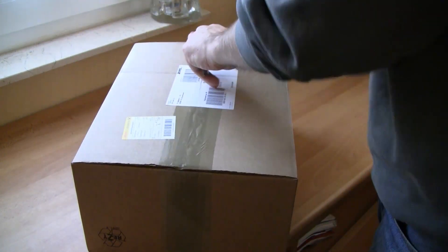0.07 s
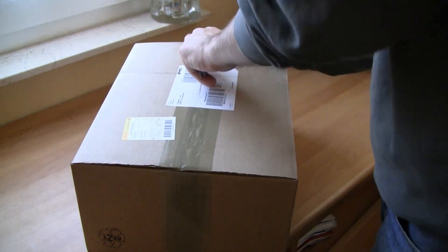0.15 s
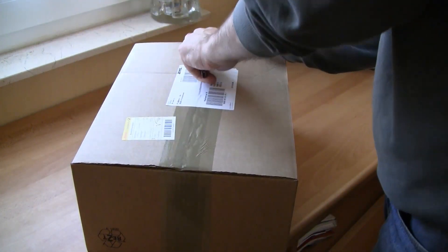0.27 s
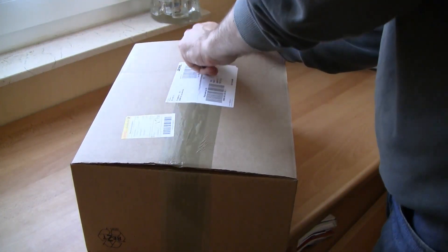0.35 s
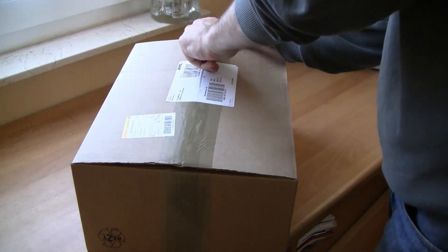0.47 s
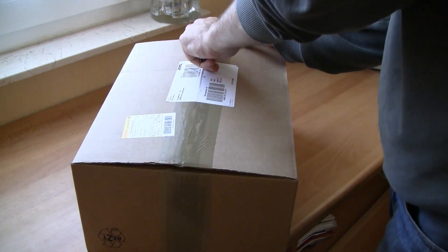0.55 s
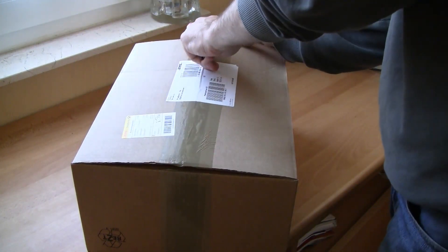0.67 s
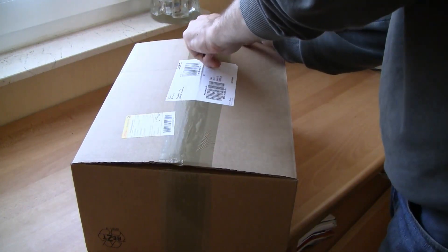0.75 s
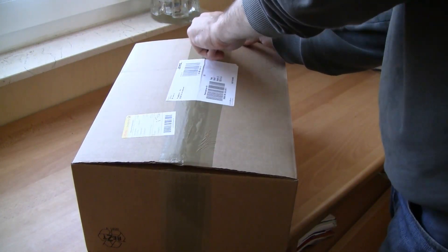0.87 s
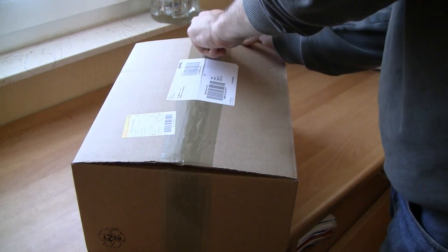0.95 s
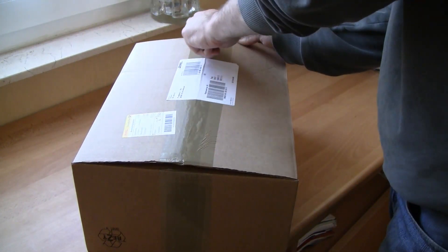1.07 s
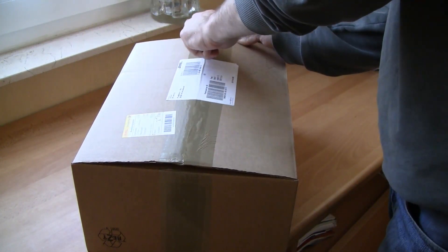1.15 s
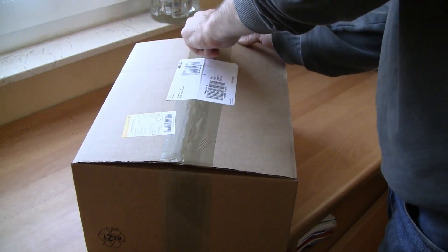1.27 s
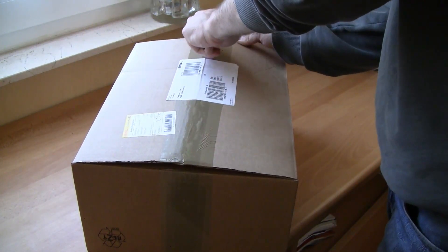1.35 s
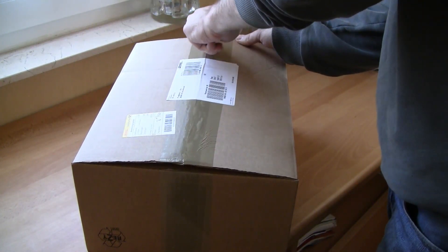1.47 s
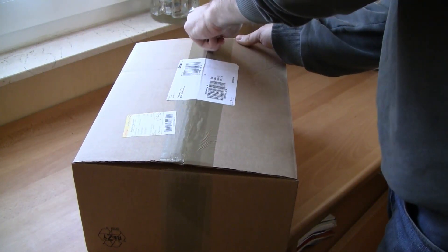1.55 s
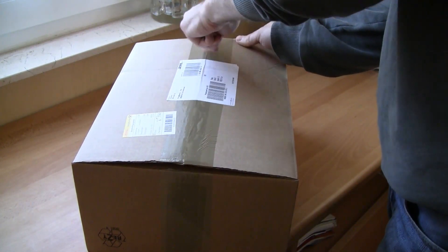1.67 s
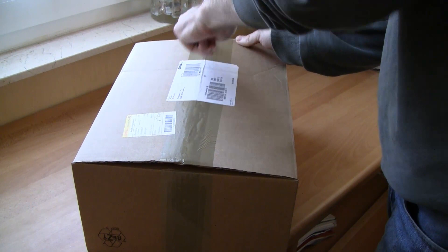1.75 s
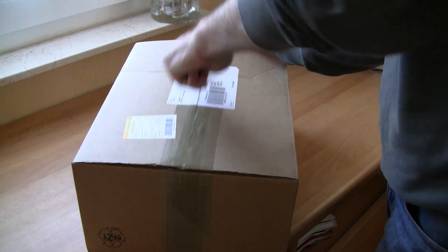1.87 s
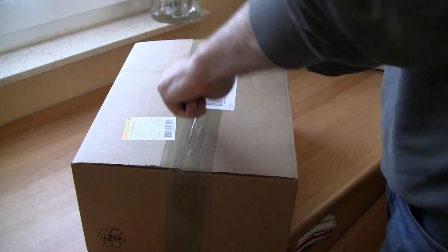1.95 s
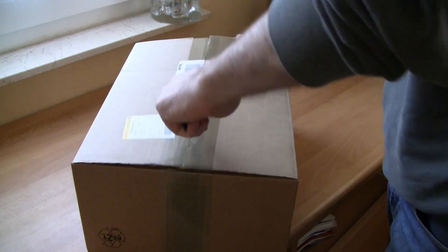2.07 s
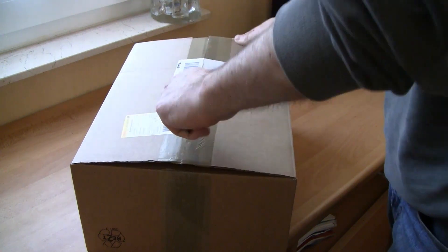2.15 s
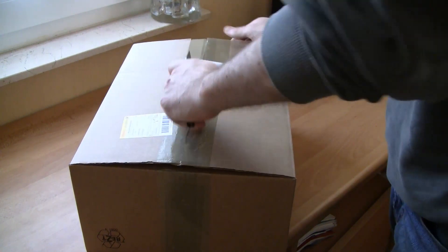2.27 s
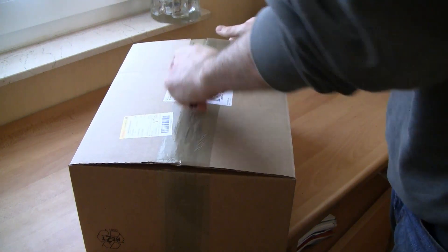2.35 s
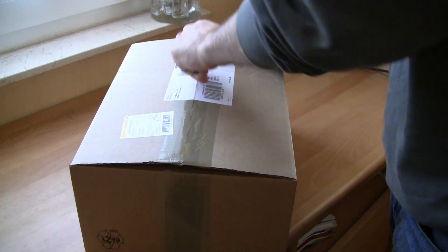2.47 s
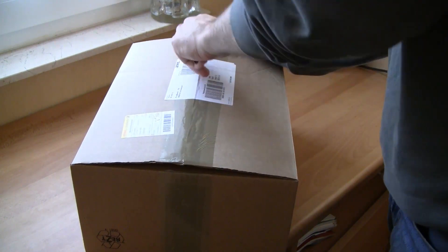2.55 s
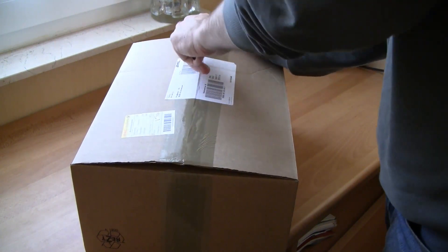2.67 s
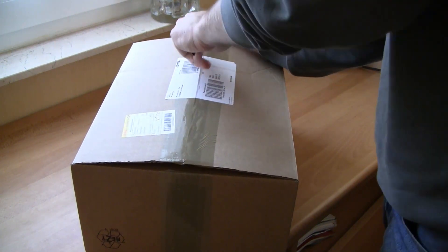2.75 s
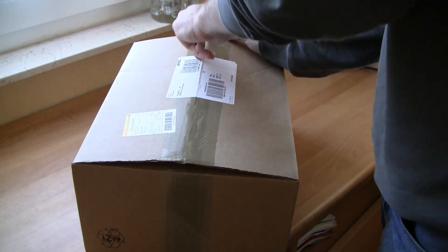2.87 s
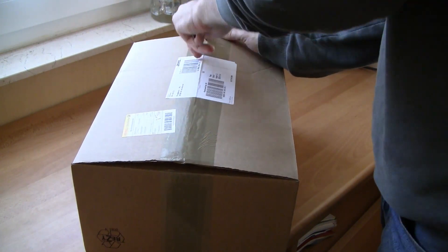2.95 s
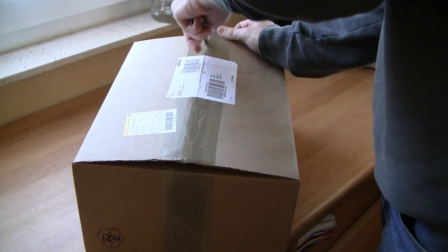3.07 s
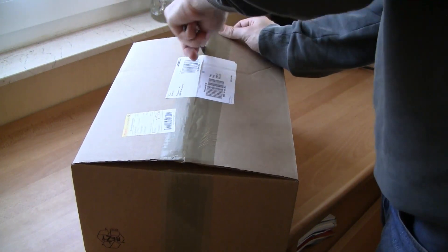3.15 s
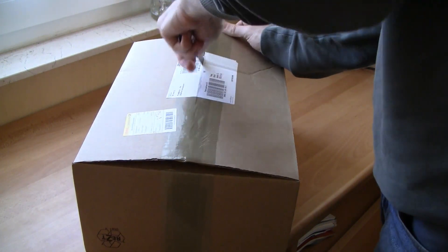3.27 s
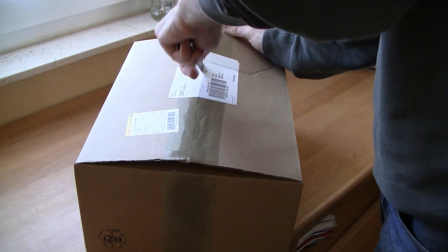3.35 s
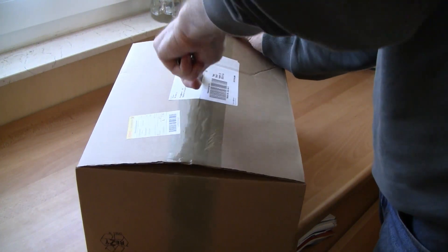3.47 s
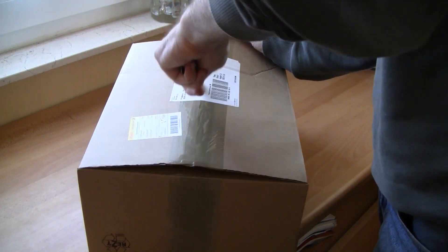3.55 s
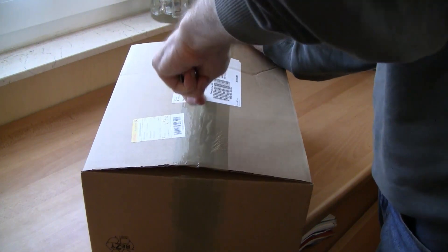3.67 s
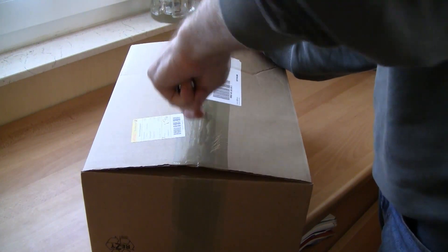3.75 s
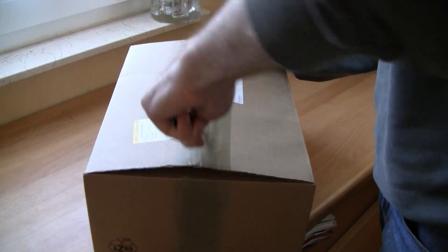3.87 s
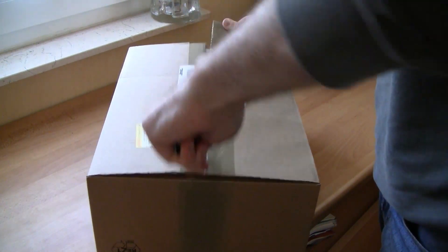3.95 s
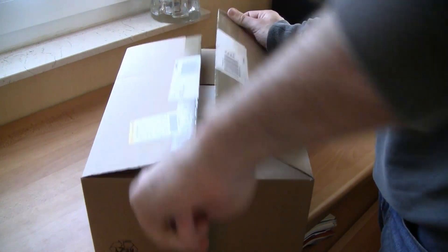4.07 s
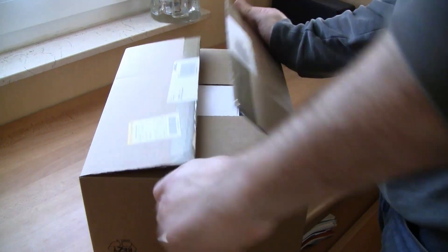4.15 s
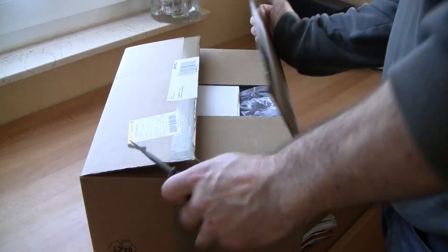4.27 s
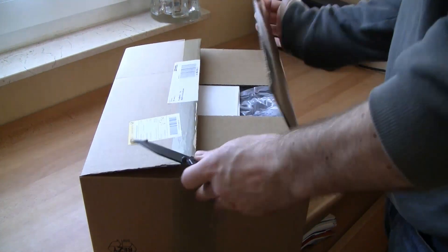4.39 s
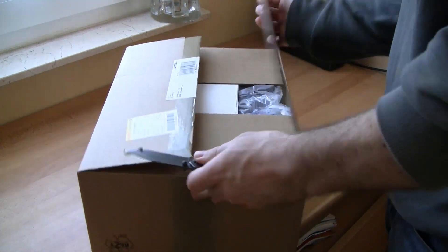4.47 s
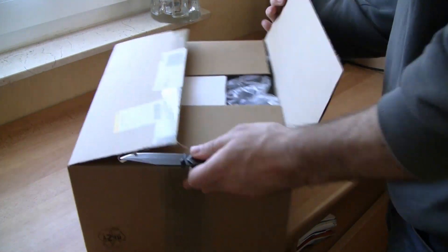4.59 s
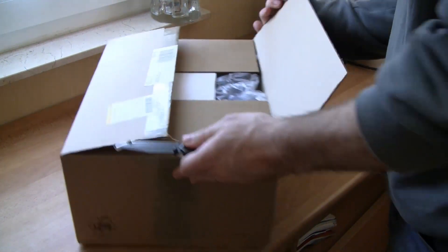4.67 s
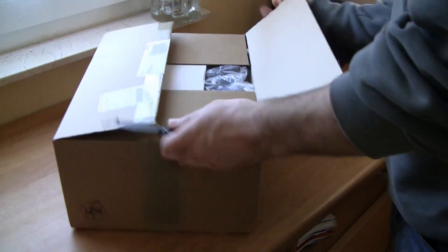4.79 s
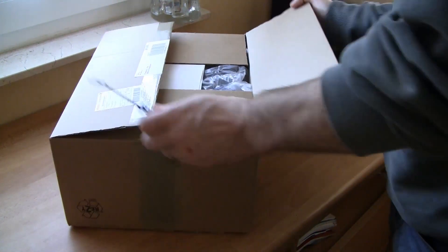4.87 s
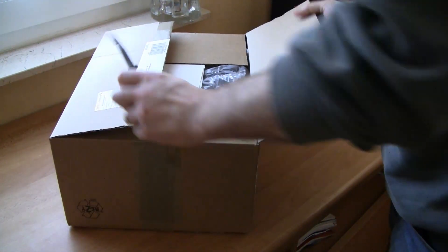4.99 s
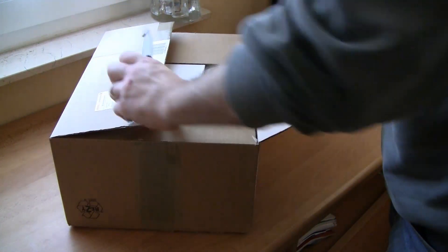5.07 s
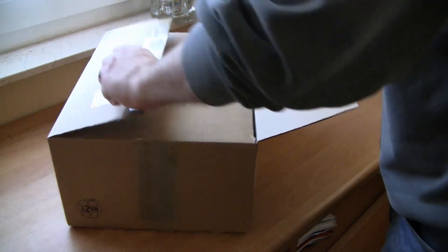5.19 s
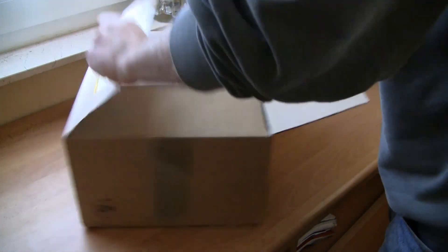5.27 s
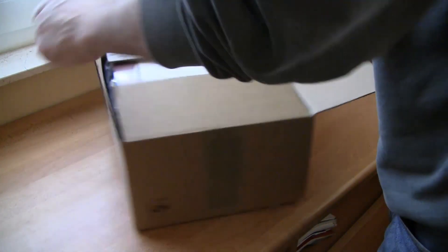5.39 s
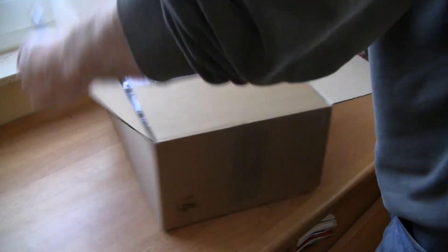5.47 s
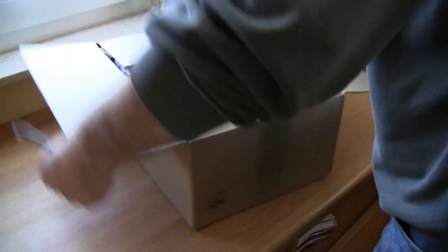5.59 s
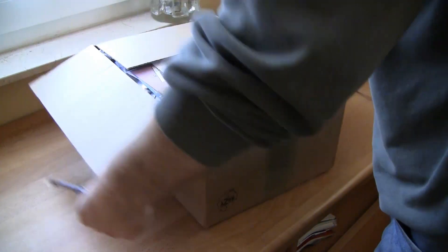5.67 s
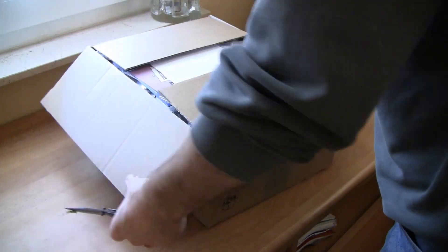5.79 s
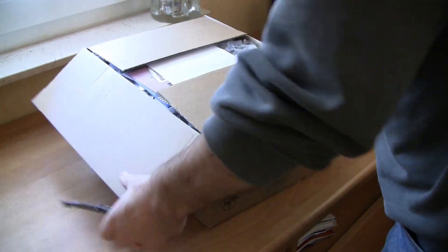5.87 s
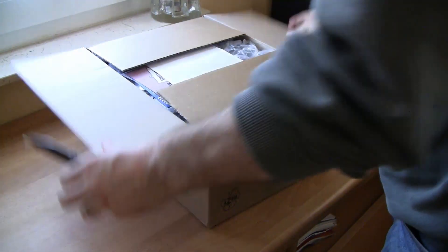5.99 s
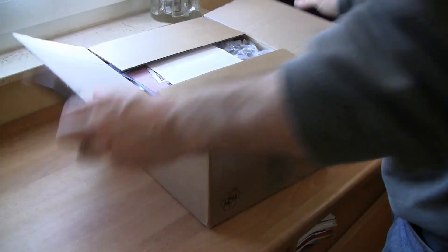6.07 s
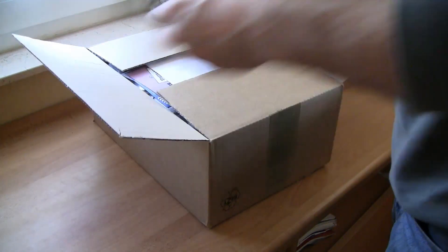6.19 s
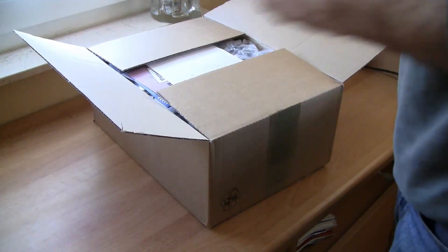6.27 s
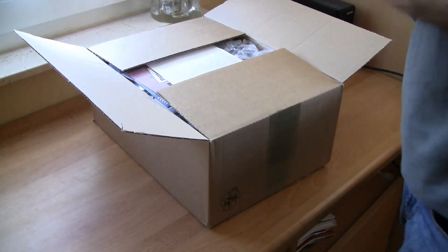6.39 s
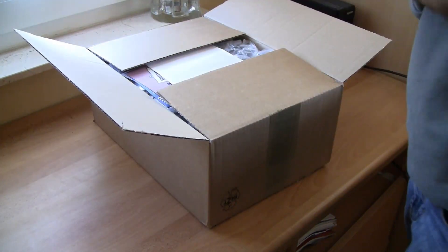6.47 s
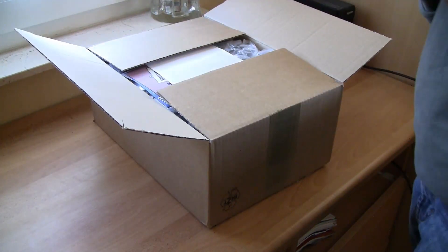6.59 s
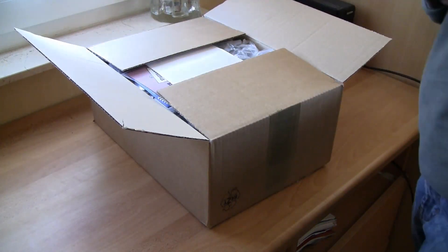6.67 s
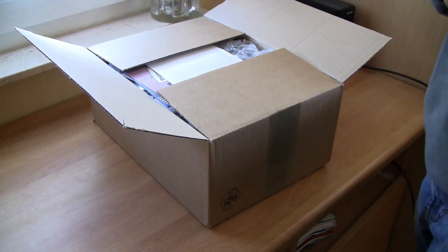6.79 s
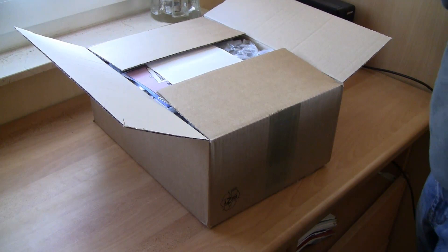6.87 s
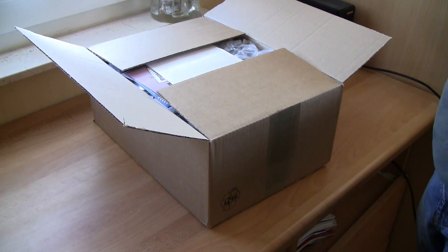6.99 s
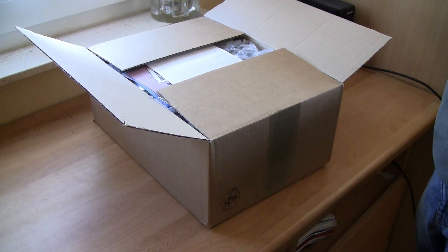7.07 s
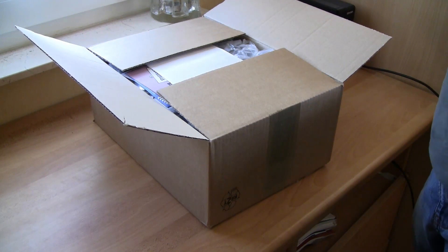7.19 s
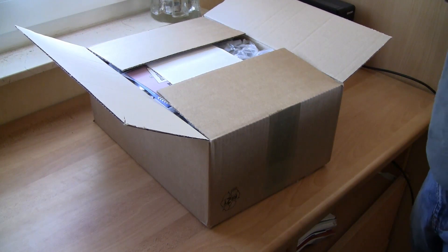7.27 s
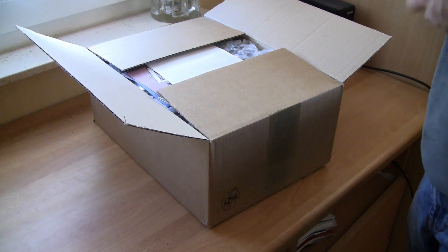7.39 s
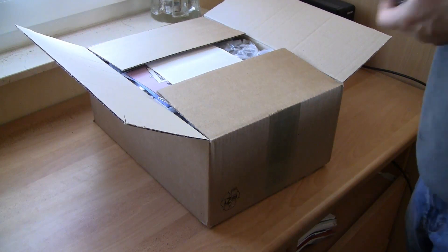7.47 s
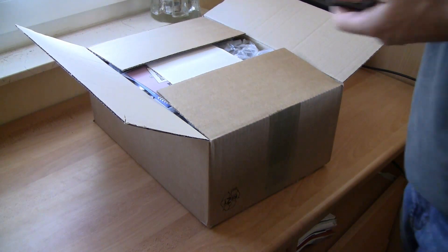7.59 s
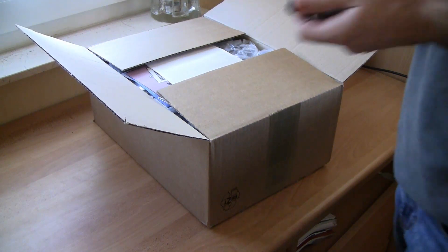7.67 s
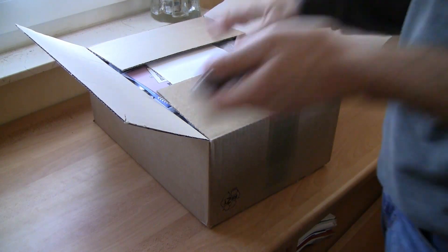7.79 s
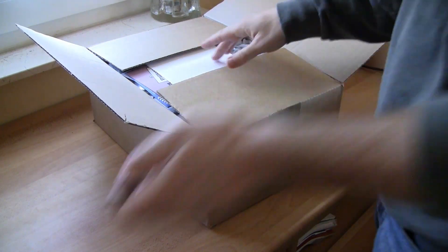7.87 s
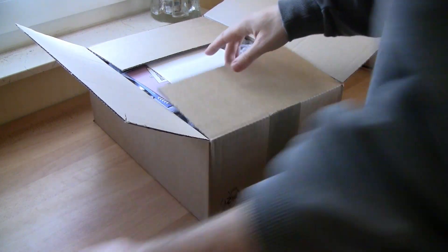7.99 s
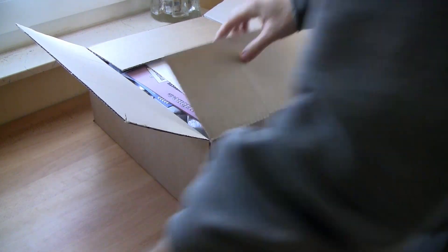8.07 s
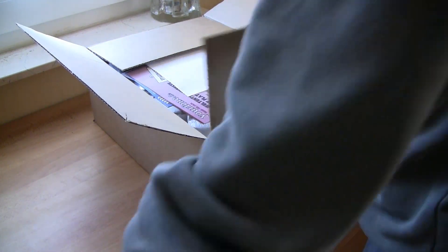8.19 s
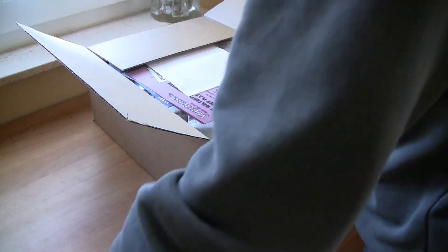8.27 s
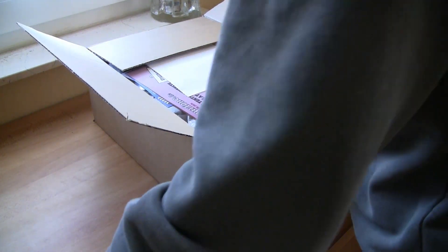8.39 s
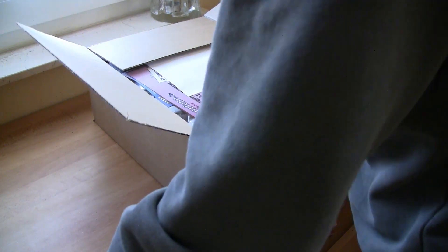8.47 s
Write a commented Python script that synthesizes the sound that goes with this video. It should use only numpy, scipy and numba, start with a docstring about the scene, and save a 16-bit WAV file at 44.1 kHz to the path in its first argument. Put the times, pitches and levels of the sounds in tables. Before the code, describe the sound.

Sparse dull knocks, dry scuffs and tape crackles on a carton come first in a small quiet room. Then a hard thump starts a tearing slit that ends in a burst of sharp cracks and a loud hollow pop. Flaps fold with papery rubbing, the box thuds and drags, and after a quiet pause a folding knife snaps shut, followed by soft handling. Heard close, in stereo.

```python
"""A hand is heard first, sliding over a hollow taped cardboard box, with light knocks and cracks; then a
knife slits the tape, flaps pop and drum the box, the box is dragged round and the knife snaps shut.
Stick-slip friction excites panel modes, enclosed air and tape noise; blows ring the panels, cracks are
noise bursts, squeezes ring the air and the knife sounds its steel modes. Beneath lie room tone and a
faint rumble; a small room reflects all but the tone to a stereo microphone."""
import sys
import numpy as np
from scipy import signal
from scipy.fft import rfft, irfft, next_fast_len
from scipy.io import wavfile
from numba import njit

SR = 44100
rng = np.random.default_rng(int(sys.argv[2]) if len(sys.argv) > 2 else 0)


def dump(signal):
    """Clip the signal to [-1, 1] and save it as 16-bit WAV at the path in sys.argv[1]."""
    limited = np.clip(np.atleast_2d(signal).T, -1, 1)
    pcm = np.round(limited * 32767).astype(np.int16)
    wavfile.write(sys.argv[1], SR, pcm)


N = 376598  # length in samples

# Background
# spectrum of the room tone: pitch_hz, density_db (per Hz)
HUSH = [(12, -24), (20, -28), (165, -13), (200, -11.5), (237, -13.5), (428, -11.5), (465, -11.5),
        (506, -10.5), (690, -14), (1280, -17.5), (3330, -26.5), (14300, -34), (16500, -45)]
HUSH_DB = -59.5  # rms of the mid signal
# room tone, side against mid: pitch_hz, level_db
HUSH_SIDE = [(60, -7), (110, -6), (200, 8), (380, 7), (700, 5), (1290, 2.5), (2380, 0), (4400, 0),
             (8120, 0), (15000, -4)]
RUMBLE_HZ, RUMBLE_DB = 60, -76

# Box panels and the air inside
# panel modes: pitch_hz, level_db, width_hz (nominal; each excitation scales it)
BOX = [(168, -10, 59), (226.6, -4.5, 11.8), (233.5, -4.5, 70), (290.5, 3.5, 104), (304, -9.5, 10),
       (343.3, -0.5, 56), (425.2, -3.5, 25), (493, -9.5, 8.3), (582.5, 8, 105), (671, 9.5, 139),
       (772.4, 10.5, 104.5), (973, 8.5, 170), (1085, 11, 185), (1360, 11.5, 321), (1582, 9.5, 374),
       (2070, 2.5, 543), (2430, -2, 510)]
UPPER_HZ = 550  # modes above this count as upper
PANEL_SPREAD = 0.059  # panel modes lean left or right by turns, giving the box some width
FLEX_DB = 0.49  # bent board shifts its modes; spread of their pitch ratio
AIR_HZ, AIR_WIDTH_HZ = 122.3, 11.8
DESK_HZ, DESK_DB = 55.6, -18.5  # the desk rumbles under the push

# blows on the box: start_s, level_db (peak before the bass cut), upper_db (against lower modes), panel_hz
KNOCKS = [(0.144, -36, -19, 303), (0.171, -29.5, -18, 183), (0.223, -18, -8.5, 284.3),
          (0.456, -38, -8, 486), (0.526, -38.5, -2, 490), (0.602, -30, -3, 870), (0.697, -34.5, 1, 1083),
          (1.024, -30, -3, 430), (1.043, -33, 1, 490), (1.093, -37.5, -14, 440), (1.1755, -17, -10.5, 343),
          (1.321, -31, -24, 443), (1.343, -40, 3, 370), (1.668, -41, -11, 331), (1.704, -20, -10, 232),
          (1.713, -29, 6, 308), (1.97, -28, -29, 303), (1.985, -26, -27, 343), (2.004, -27, -19, 440),
          (2.176, -24.5, -2, 480), (2.274, -35, -12, 497), (2.303, -30, 0, 1083), (2.32, -24.5, -19.5, 303),
          (2.456, -32, -16, 304), (2.514, -36.5, -14, 292), (2.731, -31.5, -6, 300), (2.825, -31, 17, 433),
          (2.927, -20.5, -8, 680), (2.933, -25, -9, 425), (3.056, -27, -7.5, 444), (3.165, -14.5, -8, 320),
          (3.207, -1.5, -14, 357), (3.915, -18.5, -26, 297), (3.992, -19.5, -21, 282),
          (4.107, -2, -9.5, 344), (4.113, -5, -20, 307), (4.127, -8, -17, 336), (4.446, -32.5, -13, 224),
          (4.501, -33, -15, 413), (4.552, -36, -12, 436), (4.611, -20.5, -33, 222), (4.779, -30, 6, 340),
          (4.797, -35, 6, 425), (4.837, -23.5, -13.5, 410), (4.876, -26.5, -9, 476), (5.189, -31, -11, 344),
          (5.212, -28, 3, 1610), (5.226, -25, 5, 1366), (5.245, -21.5, -24, 343), (5.261, -16, -6, 225),
          (5.291, -12, -13, 224), (5.304, -14, -15, 320), (5.325, -19.5, -17, 306),
          (5.522, -21.5, -30, 205), (5.556, -22, -15, 232), (7.009, -40.5, -6, 466),
          (7.221, -42.5, -2, 973), (7.449, -47, -22, 340), (7.55, -39, -23, 354), (8.094, -37.5, -10, 200),
          (8.167, -34.5, -15, 227), (8.273, -43.5, -11, 305), (8.519, -37, -5, 490)]
TAP, TAP_T60_S = 1.04, 0.053  # the first cycles of a blow stand out over its ring
# walls pushed in, so that the air inside booms: start_s, level_db (peak)
SQUEEZES = [(0.028, -44), (0.187, -45), (0.527, -48.5), (1.177, -47), (1.331, -46.5), (1.705, -27.5),
            (1.892, -39), (1.931, -33), (2.011, -33), (2.299, -40.5), (2.441, -46.5), (2.57, -43),
            (2.731, -38.5), (3.05, -53), (3.166, -34), (3.209, -31), (3.6, -40), (3.918, -41),
            (4.11, -50.5), (4.601, -34), (5.289, -33.5), (5.521, -42), (8.089, -49.5)]
SQUEEZE_S = 0.0049  # time constant of the shove

# Tape, paper and blade
# colour of tape and paper noise at the microphone: pitch_hz, density_db (per Hz)
TAPE = [(900, -2.5), (2000, -4.5), (2900, -1.5), (3800, -3.5), (4500, -7), (5300, -3), (6100, -1.5),
        (6900, -0.5), (7700, -3.5), (8900, -7), (10300, -5), (11900, -3.5), (13500, -7), (15300, -8.5)]
# bands of tape noise, coarse to fine: low_hz, high_hz
RASP_HISS_FIZZ_HZ = [(1400, 4500), (4500, 8800), (8800, 16000)]
# tape and paper cracking loose: start_s, level_db (peak), centre_hz
CRACKS = [(0.2243, -24.5, 2900), (0.328, -37, 2660), (0.4545, -34, 3360), (0.4612, -24.5, 7300),
          (0.528, -24.5, 6800), (0.602, -28, 5940), (0.696, -32, 6200), (0.8248, -32.5, 5500),
          (0.854, -39, 3260), (1.026, -30, 2720), (1.042, -29, 3090), (1.0937, -37, 3400),
          (1.1719, -32, 2560), (1.3222, -20.5, 6260), (1.3413, -30, 2630), (1.7033, -25, 3380),
          (2.145, -37, 4780), (2.1767, -16, 3010), (2.277, -31.5, 6920), (2.3012, -25.5, 6120),
          (2.36, -34, 2620), (2.394, -15, 3940), (2.5351, -33, 5950), (2.55, -28, 5950),
          (2.6333, -33.5, 3220), (2.6793, -59, 2600), (2.731, -37.5, 2610), (2.8157, -27, 6860),
          (2.826, -19, 2500), (2.8375, -18, 6340), (2.923, -28, 2830), (3.061, -23.5, 3590),
          (3.142, -40, 6110), (3.1649, -11.5, 2640), (3.1737, -23, 3670), (3.208, -10.5, 2660),
          (3.664, -21, 12500), (3.763, -10.5, 6900), (3.821, -31.5, 13000), (3.877, -31, 12000),
          (3.803, -14.5, 6500), (3.8417, -19, 6070), (3.8593, -16, 6070), (3.895, -8, 5630),
          (3.904, -6.5, 7100), (3.9175, -6, 6960), (3.9276, -29.5, 4580), (3.9616, -28, 7120),
          (3.9692, -12, 10700), (4.0662, -12, 6950), (4.104, -1, 3340), (4.13, -26.5, 7000),
          (4.425, -30, 5960), (4.507, -29.5, 6900), (4.712, -24.5, 2580), (4.779, -14, 7050),
          (4.779, -22, 3000), (5.209, -24, 6500), (5.229, -31, 6000), (5.308, -21, 7000),
          (5.519, -30, 7000), (5.263, -19.5, 2700), (5.292, -23, 2840), (5.363, -39, 2670),
          (5.4595, -21, 3350), (5.6683, -27, 6000), (5.725, -30, 6500), (5.747, -35, 6000),
          (7.011, -34.5, 3350), (7.226, -33, 3920), (7.7535, -47, 6110), (8.089, -36, 2520),
          (8.346, -33, 3570)]
CLICK = 1.71  # first click against the peak of the spray
CRACK_WIDE, CRACK_WIDE_HZ = 0.5, 6900  # the shortest waves differ left and right
# colour of the rubbing tape: time_s, singing_hz, rasp_db, fizz_db, singing_db
SHADE = [(3.2, 5930, 5, 9, 1.5), (3.71, 6100, 3, 3, 7), (3.75, 6650, 2, 6, 5), (3.86, 6010, -2, 7, 2),
         (3.9, 6550, 1, 7.5, 0.5), (4.45, 6050, -3, 2, 1), (4.49, 6690, -10, 10, 0.1),
         (4.62, 6200, -0.5, -1, 11), (4.86, 6700, 1.5, 5.5, 0), (4.89, 6050, 1.5, 8.5, 4.5),
         (5.44, 6500, 1, -4, 4), (5.5, 5500, 1.7, -5.5, 10), (5.95, 6250, 0, -3.5, -6),
         (6.0, 5880, 0.1, -10, 2)]
BLADE_WIDTH = 0.18  # the cut or dragged edge sings; width of each resonance as a share of its pitch
OVERTONE, OVERTONE_DB = 1.95, -9  # pitch ratio and level of the second singing tone

# Knife
# the knife locks shut: start_s, level_db (peak)
SNAP = [(7.904, -16)]
# steel modes: pitch_hz, level_db, t60_s, width_hz
STEEL = [(1790, -11, 0.067, 66), (3370, -5, 0.027, 280), (4440, -10.5, 0.19, 150), (5170, -10, 0.05, 430),
         (5900, -3, 0.051, 380), (7700, -11, 0.076, 240), (10500, -9, 0.03, 500), (11700, 7, 0.018, 820),
         (14900, -6, 0.03, 900)]
REBOUND_S, REBOUND_DB = 0.007, -18  # the lock rattles once more

# Long movements, each a curve: time_s, push_db (on the panels), pull_db (on tape and paper)
# a hand slides over the box
HAND_SLIDES = [(0.0, -40.5, -66), (0.098, -45, -59), (0.218, -46, -57), (0.222, -52, -46),
               (0.282, -47.5, -67), (0.4, -57, -68)]
# an end is torn: time_s, push_db, pull_db
END_TORN = [(1.67, -52, -72), (1.698, -43, -60), (1.704, -29.5, -42), (1.734, -39.5, -45), (1.77, -44, -44),
            (1.83, -41.5, -41.5), (1.868, -42.5, -50.5), (1.946, -43.5, -65), (1.98, -43, -53.5),
            (2.02, -43, -56), (2.11, -48.5, -62), (2.17, -55, -62)]
# the blade slits the tape: time_s, push_db, pull_db
BLADE_SLITS = [(3.1, -60, -65), (3.172, -24, -44.5), (3.242, -30.5, -53), (3.314, -34, -47),
               (3.51, -40, -45), (3.576, -45, -52.5), (3.626, -36.5, -44), (3.752, -41.5, -47),
               (3.762, -40, -39.5), (3.786, -38.5, -45), (3.914, -37, -37.5), (4.0, -34.5, -44),
               (4.094, -27, -36.5), (4.104, -22.5, -27.5), (4.15, -29.5, -45.5), (4.29, -54, -62.5)]
# the flaps fold: time_s, push_db, pull_db
FLAP_FOLDS = [(4.29, -45, -53.5), (4.418, -52.5, -59.5), (4.424, -60, -50), (4.464, -52, -65.5),
              (4.6, -37, -40), (4.684, -46, -48.5), (4.758, -44.5, -44), (4.794, -44, -34),
              (4.98, -52.5, -62)]
# the box is dragged round: time_s, push_db, pull_db
BOX_TURNS = [(4.98, -65, -64), (5.016, -48, -53), (5.2, -50, -49), (5.21, -52, -41.5), (5.274, -37, -51),
             (5.34, -45, -46.5), (5.394, -33, -40), (5.44, -40.5, -39), (5.524, -45.5, -37),
             (5.565, -35.5, -42), (5.596, -47.5, -45), (5.66, -47.5, -42.5), (5.744, -45, -43.5),
             (5.836, -48.5, -60), (5.938, -48, -51.5), (6.012, -53.5, -63.5), (6.06, -50, -53.5),
             (6.148, -51, -66), (6.3, -78, -77)]
# a hand reaches in: time_s, push_db, pull_db
HAND_REACHES_IN = [(7.97, -72, -69), (7.982, -58.5, -66), (8.222, -63, -66), (8.28, -51, -55.5),
                   (8.34, -61, -66.5), (8.35, -58, -53), (8.48, -63, -70.5), (8.54, -41, -55.5)]
# character of each movement: curve, upper_db, rasp_db, fizz_db, blade_db, boom_db (added to its push or pull)
MOVES = [(HAND_SLIDES, -7, -3.2, -5.5, -30, -8.5), (END_TORN, 0, -1.3, -2, -4.5, -8.5),
         (BLADE_SLITS, 0, -0.92, -7, -8, -13.5), (FLAP_FOLDS, 0.8, 0, -6, -16, -13.5),
         (BOX_TURNS, 0.64, 0, 0.67, -13.5, -23), (HAND_REACHES_IN, 0, 0, -0.74, -30, -23)]
SCRAPE_FROM_PULL = 0.28  # share of the pull, against the push, in the level of the upper modes
LET_GO_S = 0.0069  # a movement fades in and out over this time
# short scuffs of fingers and blade tip: start_s, length_s, push_db, upper_db, pull_db
SCUFFS = [(0.41, 0.079, -57, -54, -61.5), (0.501, 0.048, -54.5, -70, -62), (0.604, 0.017, -55, -73, -74),
          (0.69, 0.011, -48.5, -79, -58), (0.79, 0.076, -59, -60, -65), (1.005, 0.081, -57, -70, -64),
          (1.153, 0.057, -51, -77, -65), (1.317, 0.011, -52, -42, -51.5), (0.859, 0.046, -67, -56, -65.5),
          (0.92, 0.045, -61, -55, -65.5), (1.4, 0.15, -64, -76, -87), (2.69, 0.082, -56.5, -70, -67),
          (2.171, 0.017, -38.5, -37.5, -48), (2.283, 0.091, -41.5, -46.5, -55),
          (2.386, 0.021, -51, -49, -50), (2.427, 0.063, -53, -50.5, -64), (2.511, 0.055, -47.5, -51.5, -56),
          (2.605, 0.057, -52, -52.5, -64), (2.82, 0.027, -38.5, -37, -46), (2.898, 0.092, -48, -56, -68),
          (3.02, 0.051, -55, -47, -61), (4.778, 0.018, -49, -32, -52), (4.83, 0.025, -53, -33.5, -46),
          (4.706, .03, -54, -43, -60), (8.068, 0.02, -62, -52, -58), (8.348, 0.039, -54, -58, -55.5),
          (8.187, 0.03, -67, -55, -77), (8.248, 0.043, -61, -63, -69), (2.19, .028, -50, -60, -51),
          (5.457, 0.023, -57, -54, -47), (5.2, 0.045, -53, -35, -49), (6.979, 0.065, -65.5, -58, -65),
          (7.215, 0.012, -71, -69, -64), (7.914, 0.022, -73, -68, -62)]
SCUFF_ATTACK_S, SCUFF_T60_S = 0.0061, 0.18
SCUFF_RASP_DB, SCUFF_FIZZ_DB, SCUFF_BLADE_DB, SCUFF_BOOM_DB = -0.5, -5.5, -34, -11
# unceasing faint stir of hands and sleeves: levels_db of panels, upper modes, rasp, hiss, fizz
STIR = [-67, -77.5, -78, -78, -78.5]

# Room and microphone
# reverberation: pitch_hz, t60_s, level_db (against the direct sound)
ROOM = [(154, 0.39, -7.5), (395, 0.16, -6.5), (1130, 0.26, -7.5), (2410, 0.44, -8.5), (6230, 0.76, -19),
        (12000, 0.23, -11)]
ROOM_TURNS_PER_S = 1.3  # the mix of four reverberation tails turns steadily, so no pitch rings on
# left against right: pitch_hz, level_db
LEAN = [(110, 0.5), (200, -1.5), (380, -6.5), (700, -4.5), (1300, -3), (2400, 0.5), (8000, -1.6),
        (15000, 2)]
# left against right: pitch_hz, phase_rad
LEAD = [(260, -.2), (1500, .05), (6500, .1), (8300, .3), (10000, 1.0), (13200, 1.2), (15000, .3)]
LOW_CUT_HZ, TOP_HZ = 81, 15600
OPPOSED = np.array([[1], [-1]])  # a side signal enters left and right with opposite sign


def undb(db):
    """Level: decibels to amplitude gain."""
    return 10 ** (np.asarray(db) / 20)


def unit(x):
    """Normalization: scale to rms 1."""
    return x / np.sqrt(np.mean(x ** 2))


def across(table, hz):
    """Interpolation of (Hz, value) points on a logarithmic frequency axis."""
    f, v = np.transpose(table)
    return np.interp(np.log(hz + 1), np.log(np.abs(f) + 1), v)


def colour(x, table):
    """Minimum-phase filtering: a causal (Hz, dB) shape built from the folded cepstrum."""
    cepstrum = irfft(np.log(undb(across(table, np.fft.rfftfreq(2048, 1 / SR)))))
    cepstrum[1:1024] *= 2
    cepstrum[1025:] = 0
    impulse = irfft(np.exp(rfft(cepstrum)))
    return signal.fftconvolve(x, impulse)[:len(x)]


def resonate(x, hz, width_hz):
    """Resonance: one fixed mode with gain 1 at its centre."""
    return signal.lfilter(*signal.iirpeak(hz, hz / width_hz, SR), x)


@njit
def sweep(x, hz, width, sr):
    """Time-varying resonance: a state-variable filter; width is a share of the moving centre."""
    y, b, l = np.empty(len(x)), 0., 0.  # b and l hold the band and low states
    for i in range(len(x)):
        g = np.tan(np.pi * hz[i] / sr)
        v = (b + g * (x[i] - l)) / (1 + g * (g + width))
        b, l, y[i] = 2 * v - b, l + 2 * g * v, width * v
    return y


def fade(t, t60):
    """Exponential damping: 60 dB down after t60."""
    return np.exp(-np.log(1000) * t / t60)


def add(out, s, x, db):
    """Superposition: mix a short sound in at time s with the given peak."""
    i = int(s * SR)
    out[..., i:i + x.shape[-1]] += (x * undb(db) / np.abs(x).max())[..., :N - i]


def flutter(rate, depth_db):
    """Random modulation: a gain with a new random target rate times a second."""
    k = int(SR / rate)
    steps = rng.standard_normal(N // k + 2)
    wander_db = np.interp(np.arange(N), k * np.arange(len(steps)), depth_db * steps)
    return undb(wander_db)


def slips(per_s, spread_db):
    """Stick-slip: dense tiny releases of very unequal size."""
    released = rng.random(N) < per_s / SR
    return released * rng.standard_normal(N) * undb(spread_db * rng.exponential(size=N))


def spread(modes):
    """Modal radiation: panel modes lean left or right by turns, two at a time."""
    side = sum((-1) ** (k // 2) * m for k, m in enumerate(modes))
    return sum(modes) + PANEL_SPREAD * side * OPPOSED


def widen(mid, other):
    """Decorrelation: the treble of a second, similar sound separates left from right."""
    side = signal.lfilter(*signal.butter(1, CRACK_WIDE_HZ, "high", fs=SR), other)
    return mid + CRACK_WIDE * side * OPPOSED


def hush():
    """Stationary noise: coloured room tone and microphone hiss with a slight wander in level."""
    mid, side = (colour(rng.standard_normal(N), HUSH) * flutter(4.9, 0.63) for _ in range(2))
    scale = undb(HUSH_DB) / np.std(mid)
    return scale * (mid + colour(side, HUSH_SIDE) * OPPOSED)


def rumble():
    """Resonant noise: a faint low rumble of desk and floor that comes and goes."""
    mid, side = resonate(rng.standard_normal((2, N)), RUMBLE_HZ, 30)
    return undb(RUMBLE_DB) * unit(mid + 0.55 * side * OPPOSED) * flutter(1.7, 5.7)


def knife():
    """Impact of steel on steel: a bright crack and short, noise-driven modes that rattle."""
    out, t = np.zeros((2, N)), np.arange(SR // 4) / SR
    ring = 0
    for hz, db, t60, width in STEEL:
        mode = unit(resonate(rng.standard_normal(len(t)), hz, width))
        ring = ring + undb(db) * fade(t, t60) * mode
    bright_noise = np.diff(rng.standard_normal(len(t) + 1))
    crack = bright_noise * (fade(t, 0.013) + 0.35 * fade(t, 0.13))
    snap = ring + 2.0 * colour(crack, TAPE)
    snap = snap + undb(REBOUND_DB) * np.roll(snap, int(REBOUND_S * SR))
    start_s, level_db = SNAP[0]
    add(out, start_s, widen(snap, np.roll(snap, 30)), level_db)
    return out


def thumps():
    """Cavity resonance: a short shove on the walls rings the air inside, each time near one low pitch."""
    out, t = np.zeros(N), np.arange(SR // 3) / SR
    for s, peak_db in SQUEEZES:
        hz = AIR_HZ * (1 + 0.063 * rng.standard_normal())
        shove = np.exp(-t / SQUEEZE_S) * np.sin(2 * np.pi * 1.3 * hz * t)
        boom = resonate(resonate(shove, hz, 0.95 * AIR_WIDTH_HZ), hz, 89)
        add(out, s, boom, peak_db)
    return out


def cracks():
    """Sudden fracture: a click, then a rattling noise spray, brightest near the centre given."""
    out, t = np.zeros((2, N)), np.arange(SR // 16) / SR
    envelope = (fade(t, 0.024) + 0.057 * fade(t, 0.032)) * np.minimum(t / 0.00085, 1)
    for s, peak_db, hz in CRACKS:
        *noise, size = rng.standard_normal((3, len(t)))
        spray = noise * undb(5.13 * size) * envelope
        spray[:, 0] = CLICK * np.abs(spray).max()
        spray = spray + 1.8 * resonate(spray, np.clip(hz, 2000, 14000), 1700)
        spray = [colour(x, TAPE) for x in spray]
        # blunter cracks carry less of the top
        spray = signal.lfilter(*signal.butter(1, np.clip(3.0 * hz, 3000, 20000), fs=SR), spray)
        add(out, s, widen(*spray), peak_db)
    return out


def knocks():
    """Modal excitation: each blow lands elsewhere and shares its energy differently among the modes."""
    out, t = np.zeros((2, N)), np.arange(SR // 5) / SR
    hz, db, width = np.transpose(BOX)[:, :, None]
    for s, peak_db, upper_db, main_hz in KNOCKS:
        share, turn, detune = rng.standard_normal((3, len(BOX), 1))
        struck_db = 10.3 * np.exp(-(np.log(hz / main_hz) / 0.036) ** 2)  # the panel under the blow leads
        gain = undb(db + 0.12 * share + struck_db + upper_db * (hz > UPPER_HZ))
        rise = 1 - np.exp(-t * hz / 2.16)  # soft board takes about a cycle to get moving
        decay = np.exp(-np.pi * .6 * width * t) * (fade(t, 0.1) + TAP * fade(t, TAP_T60_S))
        wave = np.sin(2 * np.pi * hz * (1 + 0.029 * detune) * t + 0.46 * turn)
        add(out, s, spread(gain * rise * decay * wave), peak_db)
    # thin board radiates no deep bass
    return signal.sosfilt(signal.butter(2, 140, "high", fs=SR, output="sos"), out)


def moves():
    """Power addition: movements and scuffs give gains of panels, upper modes, rasp, hiss, fizz, blade, boom."""
    t = np.arange(0, N, 32) / SR  # gains are computed every 32 samples
    stir = np.append(undb(STIR), [0, 0])  # no stir in blade and boom
    power = np.outer(stir ** 2, np.ones(len(t)))
    at, _, *shade = np.transpose(SHADE)
    rasp, fizz, sing = (np.interp(t, at, c, left=0, right=0) for c in shade)
    for curve, scrape_db, rasp_db, fizz_db, blade_db, boom_db in MOVES:
        s, *columns = np.transpose(curve)
        push, pull = (np.interp(t, s, c) for c in columns)
        gate = np.clip(1 + np.minimum(t - s[0], s[-1] - t) / LET_GO_S, 0, 1)
        scrape = push + SCRAPE_FROM_PULL * (pull - push) + scrape_db
        levels = [push, scrape, pull + rasp_db + rasp, pull, pull + fizz_db + fizz,
                  pull + blade_db + sing, push + boom_db]
        power = power + (gate * undb(levels)) ** 2
    for s, length, push, scrape, pull in SCUFFS:
        attack = np.clip((t - s) / SCUFF_ATTACK_S, 0, 1)
        shape = attack * fade(np.maximum(t - s - length, 0), SCUFF_T60_S)
        levels = [push, scrape, pull + SCUFF_RASP_DB, pull, pull + SCUFF_FIZZ_DB,
                  pull + SCUFF_BLADE_DB, push + SCUFF_BOOM_DB]
        power = power + np.outer(undb(levels) ** 2, shape ** 2)
    return [np.interp(np.arange(N) / SR, t, gain) for gain in np.sqrt(power)]


def singing_edge(grit, hz):
    """Edge resonance: grit excites a moving pitch through two equal resonances."""
    once = sweep(grit, hz, BLADE_WIDTH, 1. * SR)
    return unit(sweep(once, hz, BLADE_WIDTH, 1. * SR))


def tape_noise():
    """Fibre tearing: rasp, hiss and fizz each flicker alone, beside the singing edge."""
    layers = []
    for edges, wide in zip(RASP_HISS_FIZZ_HZ, (.22, .45, .85)):  # the shortest waves differ most
        mid, side = (colour(slips(3000, 1.2), TAPE) for _ in range(2))  # fibres of each size tear on their own
        pair = (mid + wide * side * OPPOSED) * flutter(18, 2.2)
        band = signal.butter(3, edges, "band", fs=SR, output="sos")
        layers.append(unit(signal.sosfilt(band, pair)))
    hz = np.interp(np.arange(N) / SR, *np.transpose(SHADE)[:2])
    grit = slips(2500, 0.87)
    blade = singing_edge(grit, hz) * flutter(30, 1.2)
    overtone = singing_edge(grit, OVERTONE * hz) * flutter(6.6, 2.5)
    blade = blade + undb(OVERTONE_DB) * overtone
    return layers + [unit(widen(blade, np.roll(blade, 300)))]


def inside_air(x):
    """Cavity resonance: the air shut in the box answers near one low pitch."""
    return resonate(resonate(x, AIR_HZ, AIR_WIDTH_HZ), AIR_HZ, 3 * AIR_WIDTH_HZ)


def panel(force, hz, width_hz):
    """Plate mode: its pitch drifts as the board is bent."""
    return sweep(force, hz * flutter(6, FLEX_DB), width_hz / hz, 1. * SR)


def rubbing():
    """Friction excitation: slips drive lower and upper panel modes and the air; tape noise shares the jerk."""
    drum, scrape, *bright, boom = moves()
    jerk = flutter(35, 1.57)  # an uneven pull, felt by board and tape alike
    force = slips(2000, 0.8) * jerk
    lower, upper = [], []
    for k, (hz, db, width) in enumerate(BOX):
        if hz < UPPER_HZ:
            lower.append(undb(db) * flutter(9, 3.4) * panel(force, hz, 0.98 * width))
        else:
            mode = undb(db) * flutter(25, 1.74) * panel(force, hz, 1.95 * width)
            upper.append((-1) ** k * mode)
    desk = unit(resonate(resonate(force, DESK_HZ, 30), DESK_HZ, 50))
    box = drum * (unit(spread(lower)) + undb(DESK_DB) * desk)
    box = box + scrape * unit(spread(upper)) + boom * unit(inside_air(force))
    tape = sum(gain * layer for gain, layer in zip(bright, tape_noise()))
    return box + jerk ** 0.5 * flutter(70, 0.61) * tape


def room(x):
    """Reverberation: four tails of noise, decaying band by band, differ at each capsule; their mix turns."""
    t = np.arange(SR // 2) / SR
    tail = 0
    for hz, t60, db in ROOM:
        band = resonate(rng.standard_normal((4, 2, len(t))), hz, hz)  # four tails, two capsules
        band = band * fade(t, t60) * np.minimum(t / 0.0014, 1)
        shared = np.clip(.8 - hz / 16000, 0, 1)  # long waves reach both capsules alike
        band = shared * band[:, :1] + (1 - shared) * band
        energy = np.sum(band ** 2, axis=2, keepdims=True)
        tail = tail + undb(db) * band * np.sqrt(np.pi * hz / SR / energy)
    a = 2 * np.pi * ROOM_TURNS_PER_S * np.arange(N) / SR
    b = a / np.sqrt(7)  # a second, slower turn
    weights = [np.cos(a) * np.cos(b), np.sin(a) * np.cos(b), np.cos(a) * np.sin(b), np.sin(a) * np.sin(b)]
    return sum(signal.oaconvolve((x * w)[None], h, axes=1)[:, :N] for w, h in zip(weights, tail))


def capsules(pair):
    """Stereo reception: level and phase differ between left and right; the deep bass is weak."""
    size = next_fast_len(N)
    hz = np.fft.rfftfreq(size, 1 / SR)
    half = np.sqrt(undb(across(LEAN, hz))) * np.exp(.5j * across(LEAD, hz))
    pair = signal.sosfilt(signal.butter(2, LOW_CUT_HZ, "high", fs=SR, output="sos"), pair)
    return irfft(rfft(pair, size) * np.array([half, 1 / half]), size)[:, :N]


def scene():
    """Superposition: direct sounds and their reflections reach the microphone, over the room tone."""
    dry = rumble() + knife() + thumps() + cracks() + knocks() + rubbing()
    return capsules(dry + room(dry.mean(axis=0))) + hush()


def record(dry):
    """Soft saturation and band limiting: the highest peaks are rounded and the top is cut."""
    rounded = np.tanh(0.76 * dry) / 0.82
    return signal.sosfilt(signal.ellip(10, .2, 80, TOP_HZ, fs=SR, output="sos"), rounded)


dry = scene()
out = record(dry)
dump(out)
```